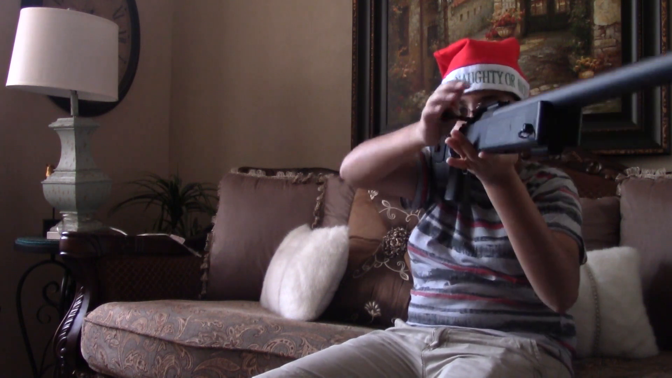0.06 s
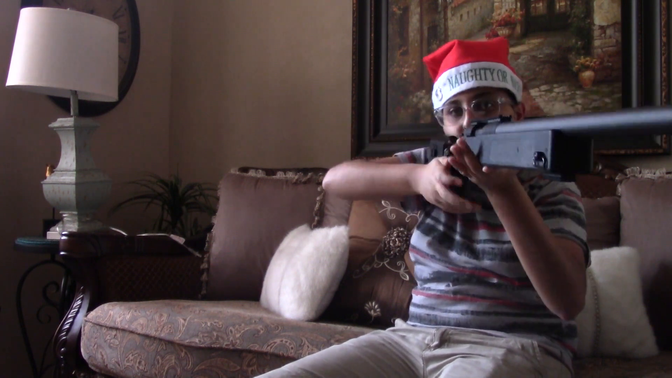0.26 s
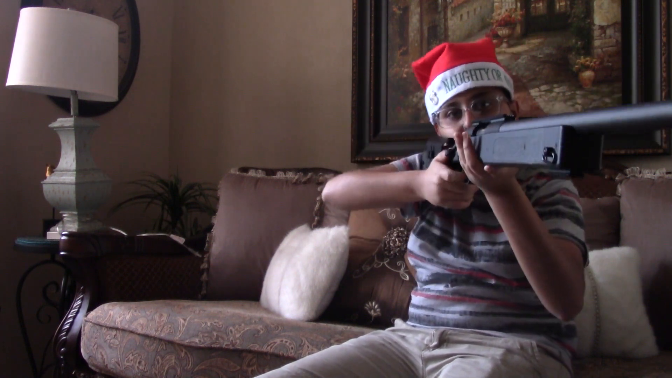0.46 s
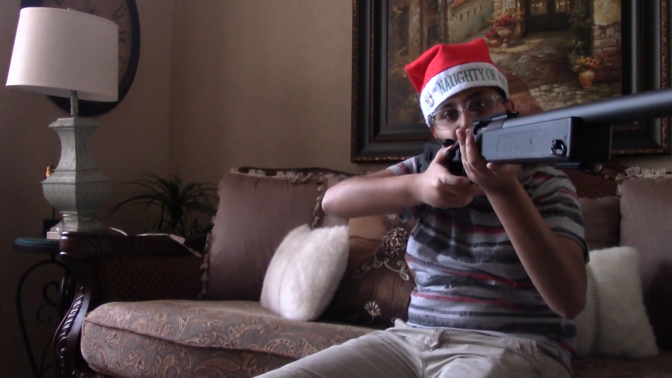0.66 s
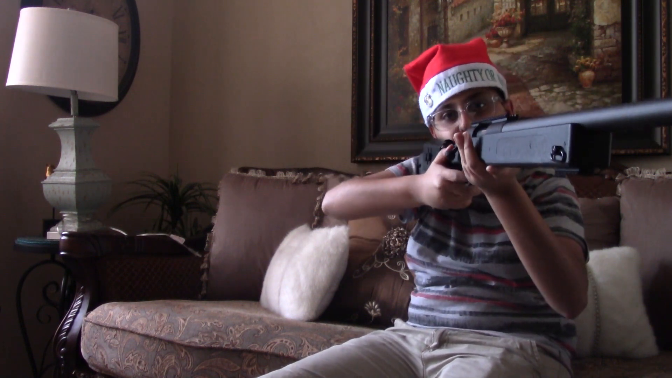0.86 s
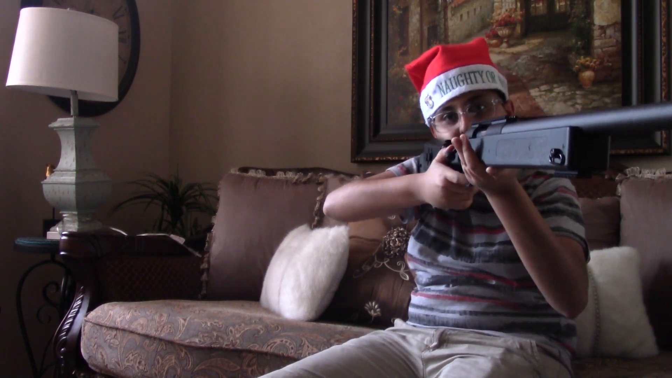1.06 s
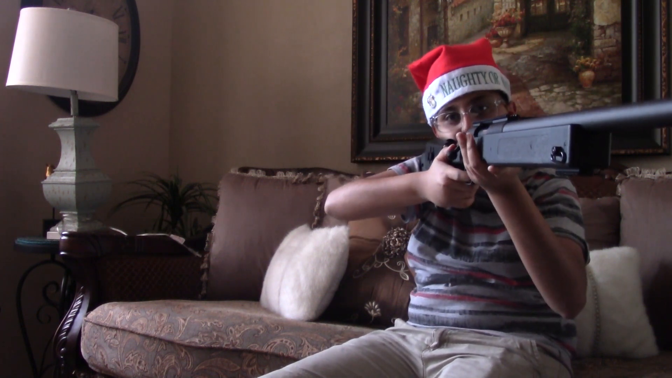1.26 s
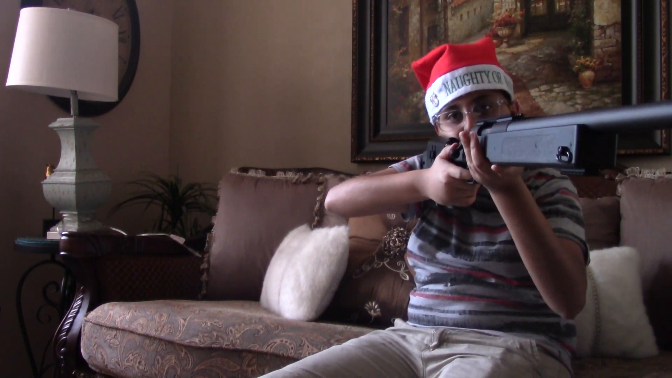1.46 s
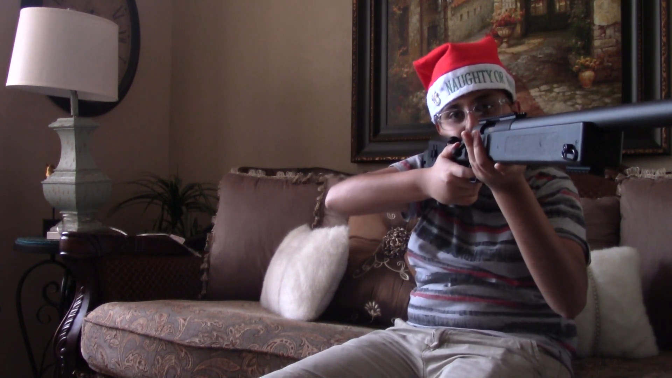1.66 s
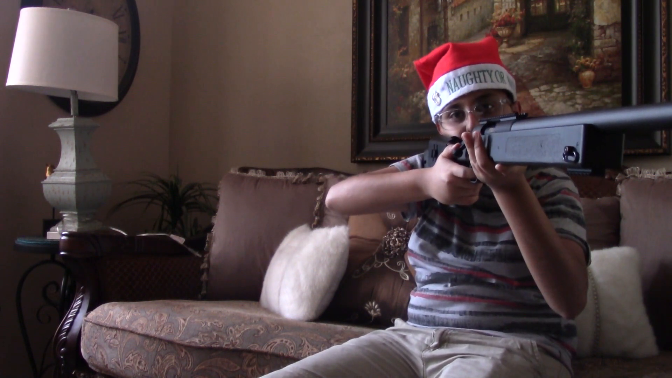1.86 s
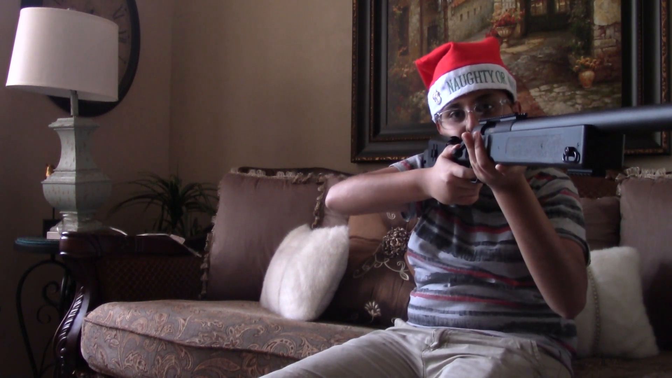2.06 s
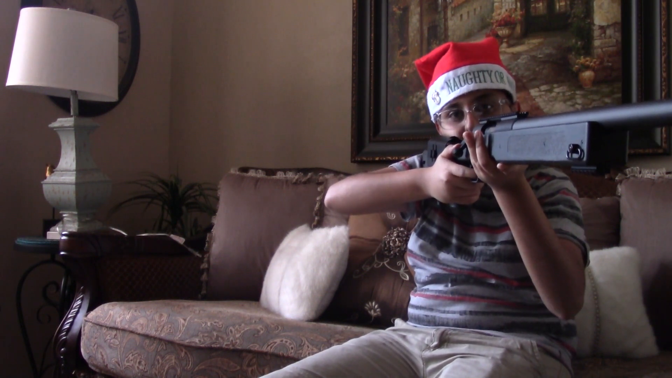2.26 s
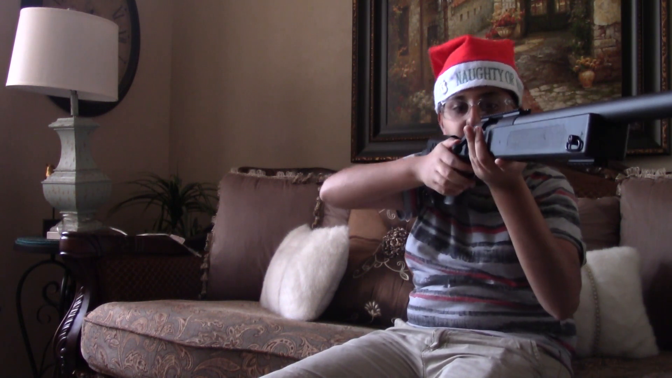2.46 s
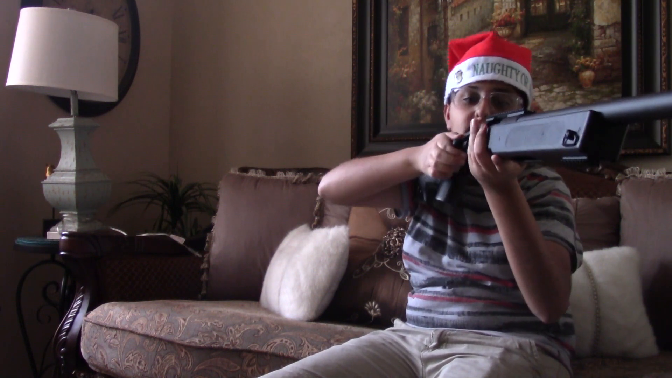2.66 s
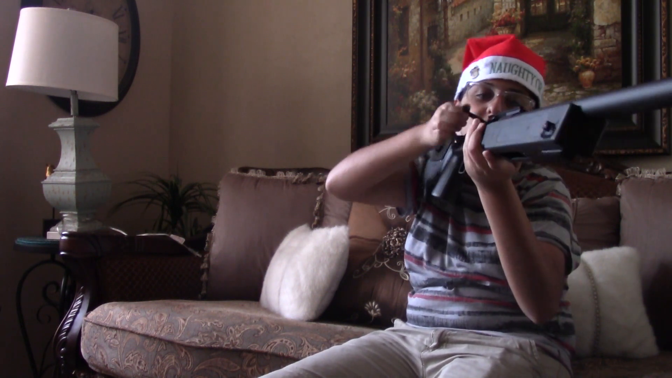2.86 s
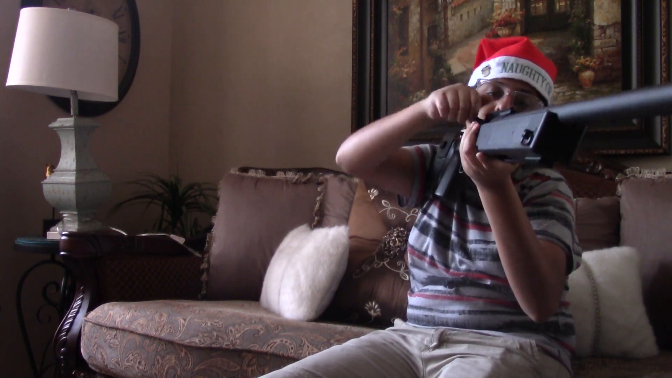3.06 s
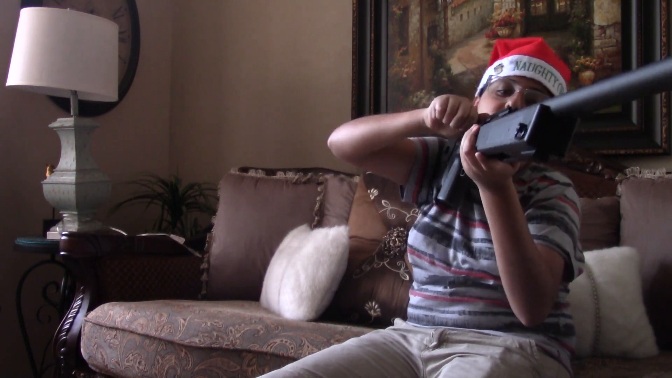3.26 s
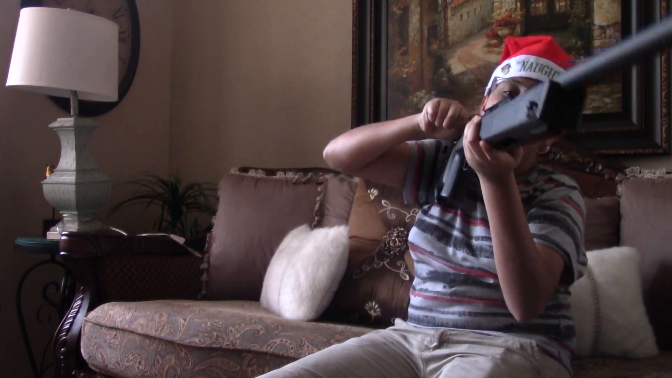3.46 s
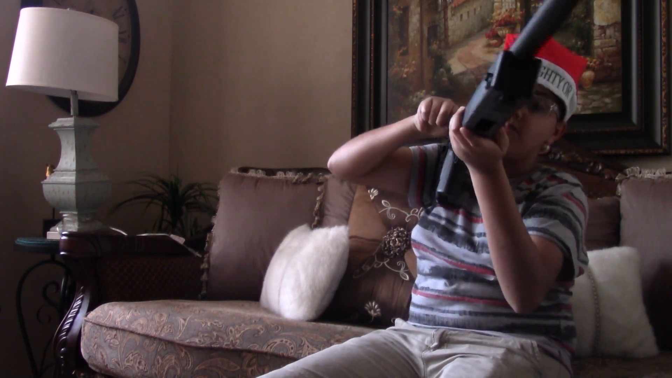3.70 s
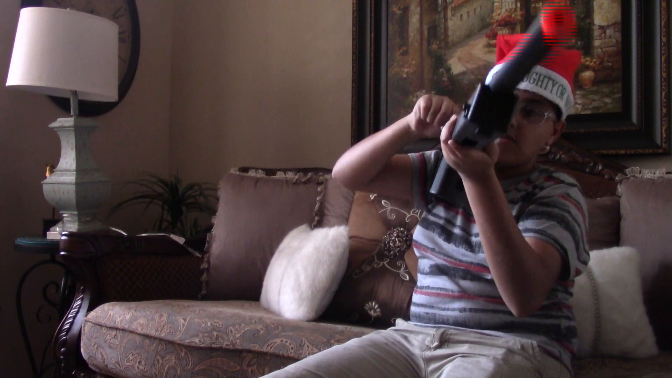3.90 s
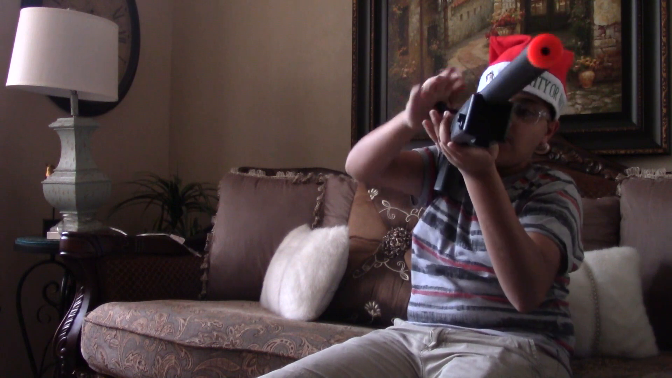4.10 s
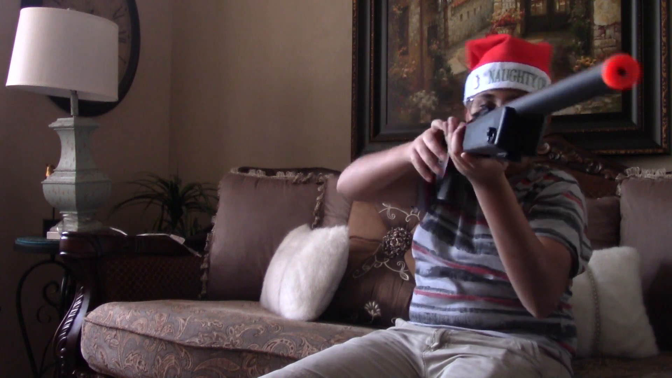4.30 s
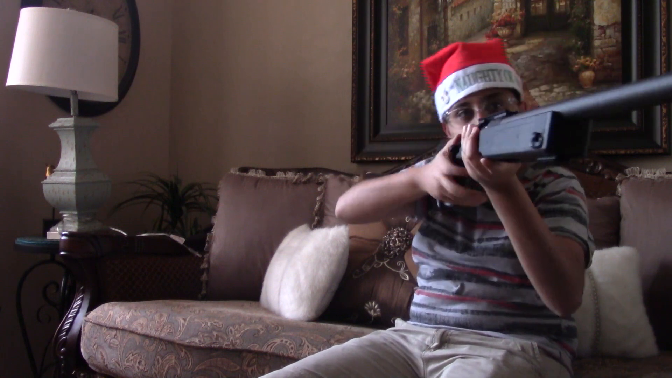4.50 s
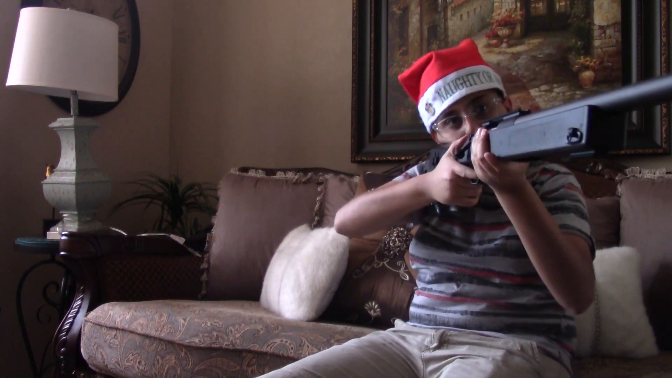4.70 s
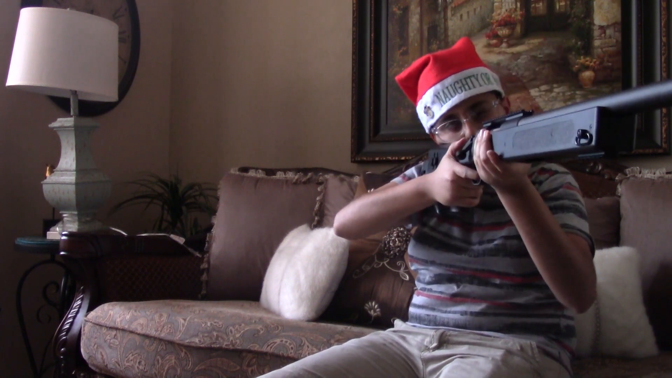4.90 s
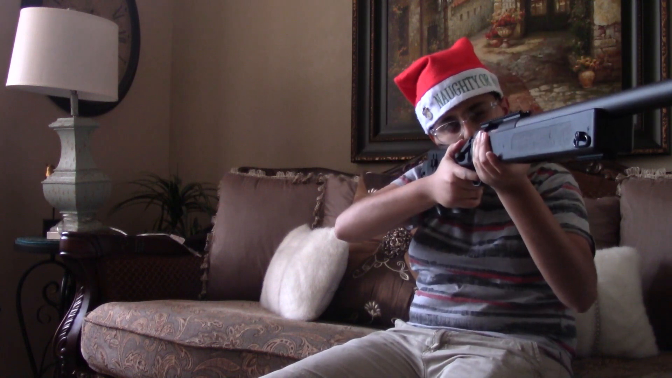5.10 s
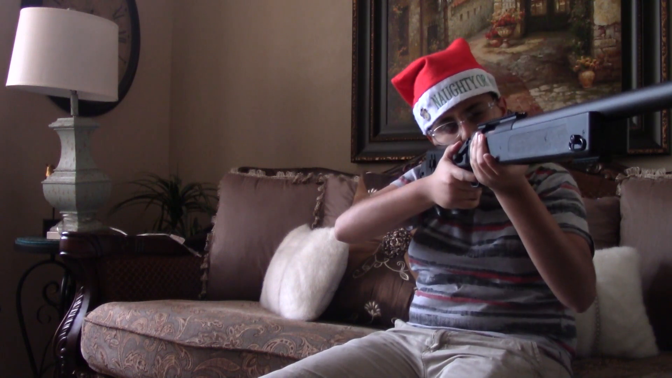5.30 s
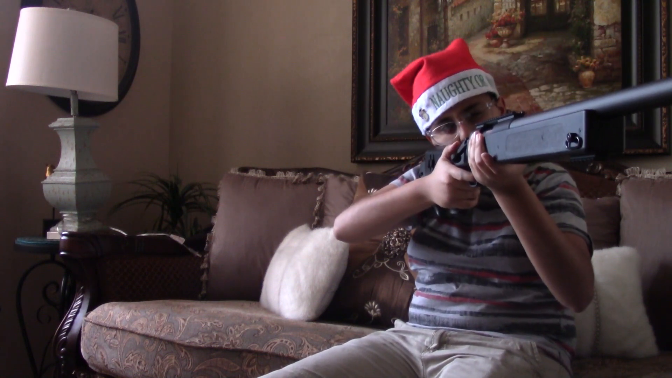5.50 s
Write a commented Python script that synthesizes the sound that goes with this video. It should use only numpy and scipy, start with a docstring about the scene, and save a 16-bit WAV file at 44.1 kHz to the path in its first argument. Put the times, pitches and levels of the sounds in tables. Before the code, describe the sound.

Stiff clacks of a toy rifle's bolt, a single loud snapping shot, then more clicking and sliding in a quiet living room.

```python
"""A spring-powered toy rifle in a living room.

The bolt is shoved home and locked and the shot snaps; then the bolt is lifted, drawn back against the
spring, shoved home and locked again. Impacts excite the damped modes of plastic and steel, sliding parts
rub by stick-slip friction, and the room reverberates over a faint hiss and ticking.
A limiter ducks the shot and lets its echo swell back."""
import sys
import numpy as np
from scipy import signal
from scipy.fft import rfft, irfft, next_fast_len
from scipy.io import wavfile
from scipy.ndimage import uniform_filter1d, map_coordinates

SR = 44100
rng = np.random.default_rng(int(sys.argv[2]) if len(sys.argv) > 2 else 0)


def wrap_up_sound(samples):
    """Save the sound to the file named by the first command line argument, as 16-bit audio."""
    columns = np.atleast_2d(samples).T
    # keep every value between -1 and 1, then stretch to whole-number steps
    tamed = np.clip(columns, -1, 1)
    steps = np.round(tamed * 32767).astype(np.int16)
    wavfile.write(sys.argv[1], SR, steps)


N = 244583
SIZE = 2 ** 15  # samples in one impact or room response
AGE, HZ = np.arange(SIZE) / SR, np.fft.rfftfreq(SIZE, 1 / SR)
IMPACT_GAIN = np.sqrt(.005 * SR)  # raises unit energy to that of 5 ms at rms 1

# reverberation time of the room: f/Hz, t60/s
ROOM_DECAY = [(100, 0.15), (260, 0.61), (700, 0.5), (1840, 0.58), (4850, 0.46), (9000, 0.37), (14000, 0.26)]
# room resonances: f/Hz, bandwidth/Hz, boost/dB
ROOM_MODES = [(152, 18, 4), (300, 30, 2), (597, 14, 4), (1027, 20, 3), (1080, 24, 5), (1254, 22, 6),
              (1415, 40, 4)]
# colour of the echo, dulled by soft furniture: f/Hz, gain/dB
ECHO_COLOUR = [(300, 3.5), (1500, 1), (5000, 0.5), (14000, -3.5)]
# stereo width of sounds in the room: f/Hz, side gain/dB
ROOM_WIDTH = [(100, -35.5), (900, -31.5), (2000, -26), (4000, -19.5), (8000, -15.5), (13000, -20)]
# spectrum of room air and hiss: f/Hz, level/dB
HUSH_SPECTRUM = [(20, -3), (55, -12), (130, -5), (260, -1), (420, -2), (700, -6), (1150, -11), (1420, -7),
                 (1800, -14.5), (2150, -13), (2600, -16.5), (5700, -21.5), (13200, -30.5), (16000, -38)]
# stereo width of that noise: f/Hz, side gain/dB
HUSH_WIDTH = [(60, -3), (240, -5), (950, -6), (3770, -7), (15000, -13.5)]
# spectrum of sliding friction: f/Hz, level/dB
RUB_SPECTRUM = [(60, -25), (200, -10), (350, 4.5), (520, -0.5), (740, 9), (1000, 1), (1700, 6), (2600, -4),
                (4500, -6.5), (8000, -14.5), (12000, -22), (16000, -35)]
# strokes of the bolt in its tube: start/s, stop/s, level/dB, brightness/dB, extra at breakaway/dB
BOLT_STROKES = [(0, 0.093, -43.5, 10.5, 2.5), (2.87, 2.948, -54, -15, 0), (3.327, 3.515, -38.5, 2, 9),
                (3.921, 4.088, -51.5, 5, 13), (4.103, 4.145, -42, 18.5, 0)]
# spectrum of a heavy contact: f/Hz, level/dB
KNOCK_SPECTRUM = [(30, -54), (100, -54), (150, -36.5), (200, -16.5), (290, -5), (450, -8.5), (700, -3),
                  (1200, 2), (2200, -3), (4000, -9.5), (7000, -13.5), (12000, -22), (16000, -33)]
# modes of the hollow stock, the steel bolt and the spring: f/Hz, level/dB, t60/s
STOCK_MODES = [(400, -16, .04), (597, -7, .04), (700, -1, .03), (750, 0, .048), (850, -8, .02),
               (1080, -11, .04)]
BOLT_MODES = [(2205, -7, .04), (2870, -8, .03), (3400, 0, .025), (3620, 6, .016), (3770, -1, .05),
              (4010, -5, .06), (4270, -9, .08), (5570, -14, .05), (6700, -14, .04)]
SPRING_MODES = [(11900, -2, .025), (12150, 0, .035)]
# the bolt meets its front stop: t/s, level/dB
BOLT_SLAMS = [(0.0891, -9), (4.154, -8)]
# spectrum of a light contact: f/Hz, level/dB
CLICK_SPECTRUM = [(40, -54), (200, -23), (600, -3.5), (1100, 0.5), (2000, 0.5), (3400, 3.5), (5500, 6),
                  (8500, 5.5), (12000, -3.5), (16000, -14)]
# modes of a small steel catch: f/Hz, level/dB, t60/s
CATCH_MODES = [(2900, -10, .014), (3600, 0, .016), (4300, -12, .025), (5150, -10, .012), (6350, -8, .012)]
# clicks of catch, trigger and grip: t/s, level/dB, bass/dB, treble/dB
LIGHT_CLICKS = [(0.1328, -18.5, -6, -8), (0.4646, -26, -2, -9), (0.8539, -47, 12, -13),
                (2.662, -52, 0, -17), (2.7234, -43, -3, -19), (3.311, -42, -3, 18), (3.3216, -34, 1, -18),
                (4.3792, -18, -17, -7), (4.515, -33, 10, -24)]
# hands bump the stock: t/s, level/dB, bass/dB
HAND_BUMPS = [(.8536, -44.5, -8), (.982, -51, 17), (2.462, -50.5, 2), (2.53, -51, 6), (3.289, -48, 17),
              (3.744, -46, 12), (4.668, -49, 0)]
# the handle turns down into its notch: t/s, level/dB, steel ring/dB, latch treble/dB
HANDLE_LOCKS = [(0.2639, -10, -12, 20), (4.303, -10.5, -13, 2)]
# spectrum of the shot: f/Hz, level/dB
SHOT_SPECTRUM = [(30, -35.5), (70, -29), (120, -19), (152, -1.5), (185, -12.5), (350, 0.5), (900, 3.5),
                 (2000, 3), (3500, -2.5), (7000, -6), (11000, -12), (16000, -21.5)]
# sear slip, spring release, piston slam and air crack:
# t/s, level/dB, contact t60/s, bass/dB, treble/dB, clink/dB, room/dB
SHOT_STAGES = [(1.9858, -17.5, 0.049, -5, 3.5, -19.5, 0), (1.99, 3, 0.011, -3.5, 13, -26.5, -11.5),
               (1.995, -4.5, 0.011, 1, 1, -21.5, 3), (1.999, -3.5, 0.013, -14, 5, -26, 3.5)]
# modes of barrel and body: f/Hz, level/dB, t60/s
BARREL_MODES = [(152, -5, .16), (360, -8, .06), (748, -3, .08), (1583, -3, .11), (1766, 1, .13),
                (2051, 1, .12)]
# knocks of cam, sear and bolt: t/s, level/dB, bass/dB, bite/dB, treble/dB, stock/dB, steel ring/dB
COCKING_KNOCKS = [(2.9497, -20, 7, 6, 9, -6, -21), (3.3447, -18, 6.5, 2.5, 1, -4.5, -30),
                  (3.4805, -25.5, -11, -4, -30, -32, -28), (3.557, -21, -23, 14.5, 10.5, -12, -20),
                  (3.9231, -19, -1, 8.5, 1.5, -16, -1), (3.953, -25, -10, 19, 9.5, -19, -0.5)]


def amp(db):
    """Amplitude ratio of a level in decibels."""
    return 10 ** (np.asarray(db) / 20)


def fade(t, t60):
    """Exponential decay by 60 dB in t60."""
    return np.exp(-np.log(1000) * t / t60)


def unit_rms(x):
    """Normalisation to rms 1."""
    return x / np.sqrt(np.mean(x ** 2))


def unit_energy(x):
    """Normalisation to energy 1."""
    return x / np.linalg.norm(x)


def along(points, hz):
    """Interpolation of (f/Hz, value) points on a logarithmic frequency axis."""
    f, v = np.transpose(points)
    return np.interp(np.log(hz + 1), np.log(f), v)


def filtered(x, response):
    """Linear filtering: the spectrum of x is multiplied by a frequency response."""
    size = next_fast_len(x.shape[-1] + SR // 4)
    return irfft(rfft(x, size) * response(np.fft.rfftfreq(size, 1 / SR)), size)[..., :x.shape[-1]]


def shaped(x, colour_db, bins):
    """Minimum-phase filtering gives x a smoothed spectrum and energy 1; its fine structure stays."""
    spectrum = rfft(x)
    envelope = np.sqrt(np.abs(uniform_filter1d(np.abs(spectrum) ** 2, size=bins)))
    cepstrum = irfft(np.log(amp(colour_db) / envelope))
    cepstrum[1:SIZE // 2] *= 2  # folding the cepstrum makes the filter causal
    cepstrum[SIZE // 2 + 1:] = 0
    return unit_energy(irfft(spectrum * np.exp(rfft(cepstrum))))


def add(track, s, sound):
    """Superposition of a stereo sound on the track at time s."""
    part = track[:, round(s * SR):][:, :sound.shape[1]]
    part += sound[:, :part.shape[1]]


def in_room(x, room_db, gap_s=.0077, early_db=3, early_t60=.16, near_db=-9, direct_side_db=-1):
    """Reverberation: early reflections and a diffuse tail follow the direct sound, nearly in mono."""
    hz, t, noise = signal.stft(rng.standard_normal((2, SIZE)), SR, nperseg=256)
    decay = fade(t, along(ROOM_DECAY, hz)[:, None]) + amp(early_db) * fade(t, early_t60)
    tails = signal.istft(noise * decay, SR, nperseg=256)[1][:, :SIZE]
    tails *= np.interp(AGE, [0, gap_s / 2, gap_s], [0, amp(near_db), 1])
    peaks_db = sum(db / (1 + (2 * (HZ - f) / width) ** 2) for f, width, db in ROOM_MODES)
    responses = [shaped(tail, along(ECHO_COLOUR, HZ) + peaks_db, bins=40) for tail in tails]
    mid, side = (amp(room_db) * signal.fftconvolve(x, h)[:len(x)] for h in responses)
    side = filtered(side + amp(direct_side_db) * x, lambda f: 1j * amp(along(ROOM_WIDTH, f)))
    return np.array([x + mid + side, x + mid - side])


def hush(mid_db=-54.5):
    """Stationary noise of room air and microphone hiss, partly correlated between the channels."""
    mid, side = filtered(rng.standard_normal((2, N)), lambda f: amp(along(HUSH_SPECTRUM, f)))
    mid = unit_rms(mid)
    side = filtered(unit_rms(side), lambda f: amp(along(HUSH_WIDTH, f)))
    return amp(mid_db) * np.array([mid + side, mid - side])


def faint_ticking(tick_hz=2200, beat_hz=60, db=-55, share=.69, width_s=.001, scatter_db=3):
    """Gaussian tone pulses fall at random on a steady beat, like a small motor stepping."""
    beat = np.arange(N) / SR * beat_hz
    count = int(beat[-1]) + 1
    sounding = rng.random(count) < share
    strength = sounding * amp(db + scatter_db * rng.standard_normal(count))
    t = (beat % 1 - .5) / beat_hz
    return strength[beat.astype(int)] * np.exp(-(t / width_s) ** 2) * np.sin(2 * np.pi * tick_hz * t)


def bolt_slide(slips_per_s=500, rough_db=4, rise_db_per_s=802, fall_db_per_s=501.5, breakaway_s=.07):
    """Stick-slip friction: the bolt rubs unevenly, throaty when drawn and hissing when pushed."""
    t = np.arange(N) / SR
    grip = map_coordinates(rng.standard_normal(N), [t * slips_per_s], order=1)
    slips = rng.standard_normal(N) * amp(rough_db * grip)
    rub = unit_rms(filtered(slips, lambda f: amp(along(RUB_SPECTRUM, f))))
    hiss = filtered(rub, lambda f: 1 - 1 / (1 + (f / 3200) ** 4))
    out = np.zeros(N)
    for start, stop, db, bright_db, breakaway_db in BOLT_STROKES:
        edges_db = rise_db_per_s * np.minimum(t - start, 0) + fall_db_per_s * np.minimum(stop - t, 0)
        sticking = np.exp(-(np.maximum(t - start, 0) / breakaway_s) ** 2)  # gives way to sliding
        out += amp(db + edges_db + breakaway_db * sticking) * (rub + (amp(bright_db) - 1) * hiss)
    return in_room(out, room_db=-5)


def crack(colour_db, t60, rise_s=.001, rebound_s=.0023, rebound_db=-5):
    """Contact noise: two surfaces meet, chatter briefly and touch once more on the rebound."""
    touch = lambda t: (1 - np.exp(-(t / rise_s) ** 2)) * fade(t, t60)
    force = touch(AGE) + amp(rebound_db) * touch(np.maximum(AGE - rebound_s, 0))
    return shaped(rng.standard_normal(SIZE) * force, colour_db, bins=200)


def ring(modes, rise_s=.001):
    """Free vibration: a sum of damped modes, with slightly new strengths at each blow."""
    sound = np.zeros(SIZE)
    for hz, db, t60 in modes:
        strength = amp(db + rng.standard_normal())
        sound += strength * fade(AGE, t60) * np.sin(2 * np.pi * (hz * AGE + rng.random()))
    return unit_energy(sound * (1 - np.exp(-(AGE / rise_s) ** 2)))


def knock(t60, bass_db, bite_db, treble_db, stock_db, steel_db, spring_db, room_db, body_db=0):
    """Impact excitation: a heavy contact cracks and sets stock, bolt and spring ringing."""
    tilt = [(300, bass_db), (600, bass_db / 2 + body_db), (1100, 0), (3300, bite_db), (10000, treble_db)]
    blow = crack(along(KNOCK_SPECTRUM, HZ) + along(tilt, HZ), t60)
    blow += amp(stock_db) * ring(STOCK_MODES, rise_s=.0016)
    blow += amp(steel_db) * ring(BOLT_MODES)
    blow += amp(spring_db) * ring(SPRING_MODES)
    return IMPACT_GAIN * in_room(blow, room_db)


def bolt_slams(rebound_s=.0195, rebound_db=-2.5):
    """Inelastic collision: the bolt hits its front stop and rebounds once, softer and brighter."""
    out = np.zeros((2, N))
    for s, db in BOLT_SLAMS:
        hit = knock(t60=.024, bass_db=.5, body_db=1.5, bite_db=2, treble_db=-1.5,
                    stock_db=-11.5, steel_db=-19, spring_db=-27, room_db=-2)
        rebound = knock(t60=.042, bass_db=6.5, body_db=-4.5, bite_db=6, treble_db=4.5,
                        stock_db=-4, steel_db=-17, spring_db=-26, room_db=-9)
        add(out, s, amp(db) * hit)
        add(out, s + rebound_s, amp(db + rebound_db) * rebound)
    return out


def snap(spectrum, t60, bass_db, treble_db, clink_db, room_db):
    """A broadband transient with the modal clink of a small steel catch."""
    tilt = [(600, bass_db), (3000, 0), (11000, treble_db)]
    click = crack(along(spectrum, HZ) + along(tilt, HZ), t60) + amp(clink_db) * ring(CATCH_MODES)
    return IMPACT_GAIN * in_room(click, room_db)


def handling():
    """Brief contacts of small parts click; longer, softer contacts of hand and stock thud."""
    out = np.zeros((2, N))
    for s, db, bass_db, treble_db in LIGHT_CLICKS:
        click = snap(CLICK_SPECTRUM, .0049, bass_db, treble_db, clink_db=-13, room_db=-5.5)
        add(out, s, amp(db) * click)
    for s, db, bass_db in HAND_BUMPS:
        bump = knock(t60=.03, bass_db=bass_db, bite_db=-4, treble_db=-7,
                     stock_db=-4, steel_db=-28, spring_db=-40, room_db=-.5)
        add(out, s, amp(db) * bump)
    return out


def handle_locks(latch_lead_s=.0168, latch_db=-13, settle_s=.015, settle_db=-5.5):
    """Successive impacts: the latch clicks, the handle lands on the resonant stock and settles dully."""
    out = np.zeros((2, N))
    for s, db, steel_db, treble_db in HANDLE_LOCKS:
        latch = snap(CLICK_SPECTRUM, .0048, bass_db=-24, treble_db=treble_db, clink_db=4.5, room_db=-3)
        landing = knock(t60=.0073, bass_db=0, body_db=7, bite_db=8, treble_db=7,
                        stock_db=-4, steel_db=steel_db, spring_db=-27.5, room_db=-1.5)
        settling = knock(t60=.023, bass_db=1.5, body_db=12.5, bite_db=3, treble_db=1.5,
                         stock_db=-3.5, steel_db=-23, spring_db=-26, room_db=-3.5)
        add(out, s - latch_lead_s, amp(db + latch_db) * latch)
        add(out, s, amp(db) * landing)
        add(out, s + settle_s, amp(db + settle_db) * settling)
    return out


def shot():
    """Release of elastic energy: sear, spring, piston and air crack in quick succession."""
    out = np.zeros((2, N))
    for s, db, *timbre in SHOT_STAGES:
        add(out, s, amp(db) * snap(SHOT_SPECTRUM, *timbre))
    return out


def muzzle(s=1.9935, width_s=.0006, puff_db=10, barrel_db=-7):
    """Air driven out by the piston radiates one pressure pulse; barrel and body ring on."""
    out = np.zeros((2, N))
    u = AGE / width_s - 4
    puff = amp(puff_db) * (u * u - 1) * np.exp(-u * u / 2)  # second derivative of a Gaussian
    body = amp(barrel_db) * IMPACT_GAIN * ring(BARREL_MODES, rise_s=.0037)
    add(out, s, in_room(puff, room_db=-16) + in_room(body, room_db=-7.5))
    return out


def handle_lift(start_s=2.8557, count=6, first_gap_s=.0185, gap_ratio=.95, first_db=-50, last_db=-31):
    """Stick-slip motion: the handle creaks up its cam, faster and harder as the load grows."""
    out = np.zeros((2, N))
    for k in range(count):
        s = start_s + first_gap_s * (1 - gap_ratio ** k) / (1 - gap_ratio)
        db = first_db + (last_db - first_db) * (k / (count - 1)) ** 2
        slip = snap(CLICK_SPECTRUM, t60=.012, bass_db=12.5, treble_db=-12.5, clink_db=-7.5, room_db=-1)
        add(out, s, amp(db) * slip)
    return out


def cocking(twang_s=3.35, twang_db=-35):
    """Parts collide as the bolt is lifted, drawn and released; the spring vibrates as it takes load."""
    out = np.zeros((2, N))
    for s, db, *timbre in COCKING_KNOCKS:
        add(out, s, amp(db) * knock(.012, *timbre, spring_db=-40, room_db=-3))
    add(out, twang_s, amp(twang_db) * IMPACT_GAIN * in_room(ring(SPRING_MODES), room_db=-2))
    return out


def scene():
    """Superposition of the rifle's action, its shot and the quiet background."""
    action = bolt_slams() + handle_locks() + handle_lift() + cocking() + bolt_slide() + handling()
    return action + shot() + muzzle() + hush() + faint_ticking()


def record(dry, threshold_db=-6, max_depth_db=17, release_db_per_s=180, low_hz=70, top_hz=16100):
    """Limiting with instant attack and steady release, then soft clipping and band limiting."""
    power = np.abs(uniform_filter1d(np.mean(dry ** 2, axis=0), size=48))
    excess_db = np.clip(10 * np.log10(power + 1e-12) - threshold_db, 0, max_depth_db)
    recovery_db = release_db_per_s * np.arange(N) / SR
    limited = dry * amp(recovery_db - np.maximum.accumulate(excess_db + recovery_db))
    rounded = limited / (1 + limited ** 6) ** (1 / 6)
    low_cut = signal.butter(2, low_hz, "high", fs=SR)
    return filtered(signal.lfilter(*low_cut, rounded), lambda f: 1 / (1 + (f / top_hz) ** 160))


dry = scene()
out = record(dry)
wrap_up_sound(out)
```